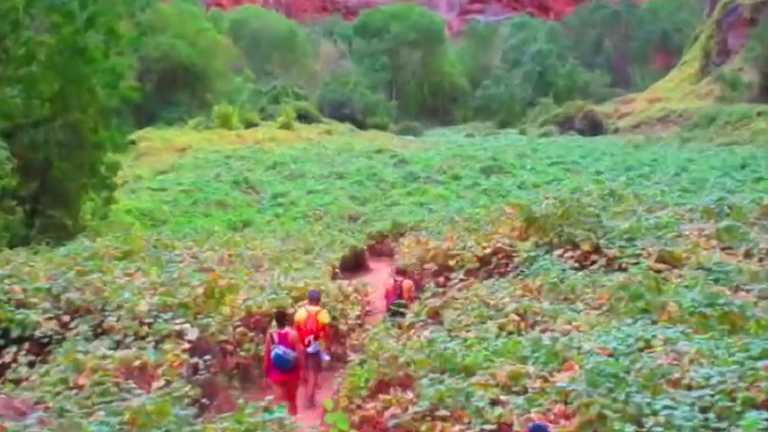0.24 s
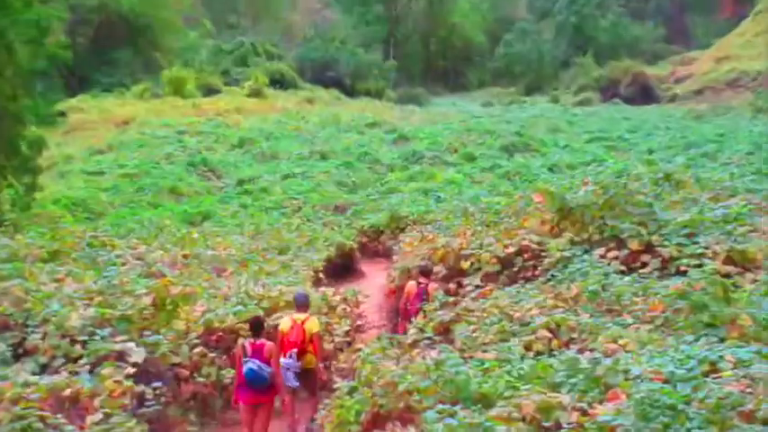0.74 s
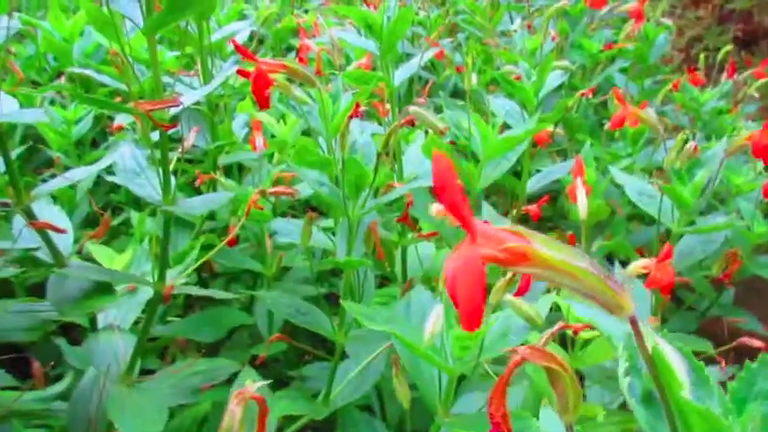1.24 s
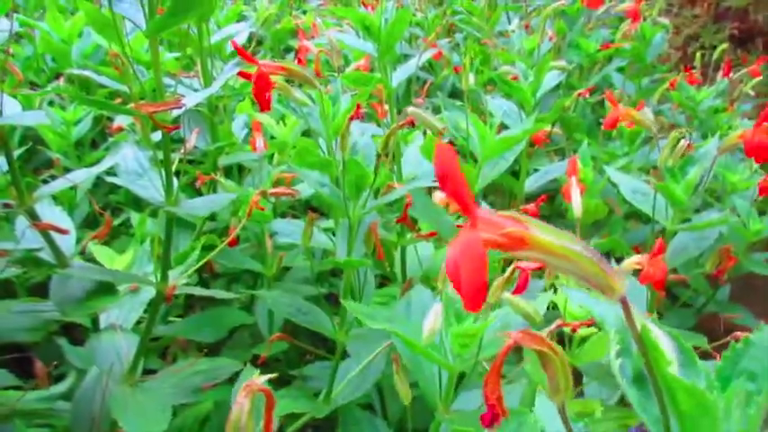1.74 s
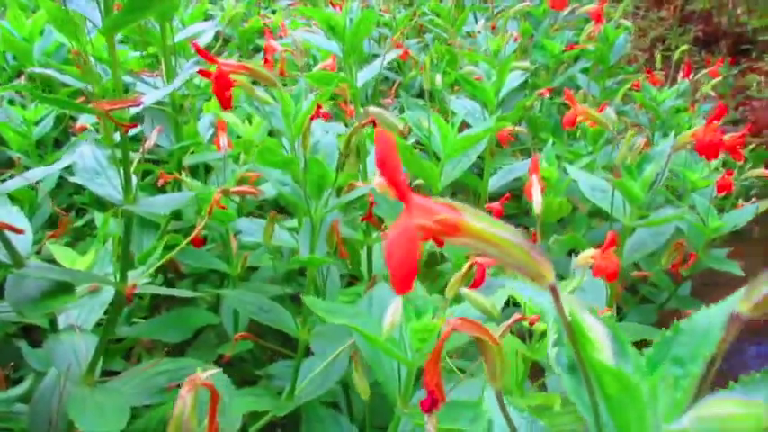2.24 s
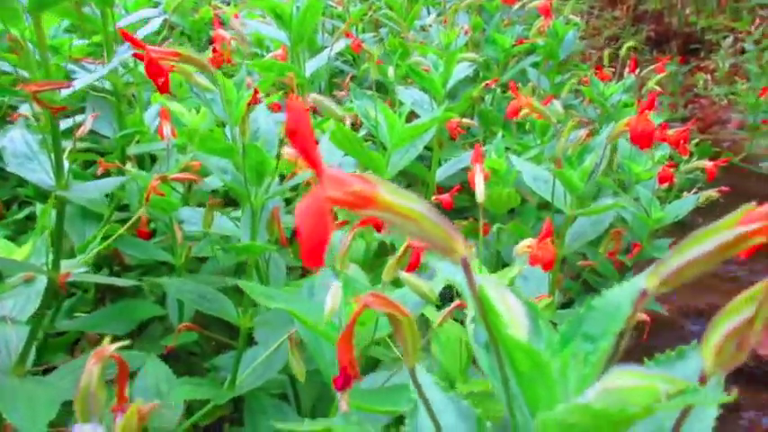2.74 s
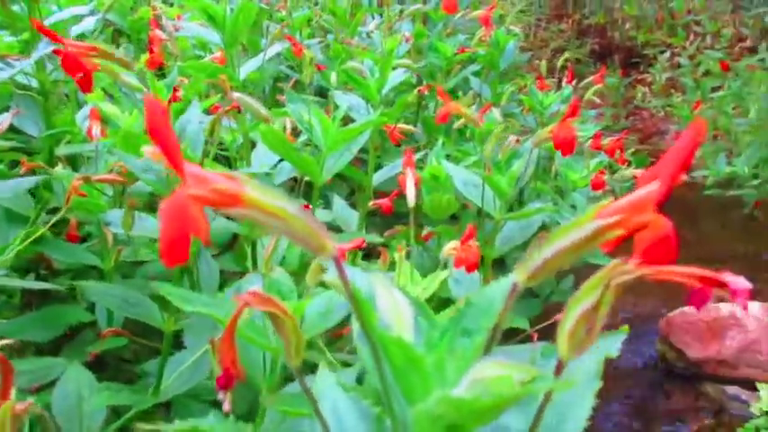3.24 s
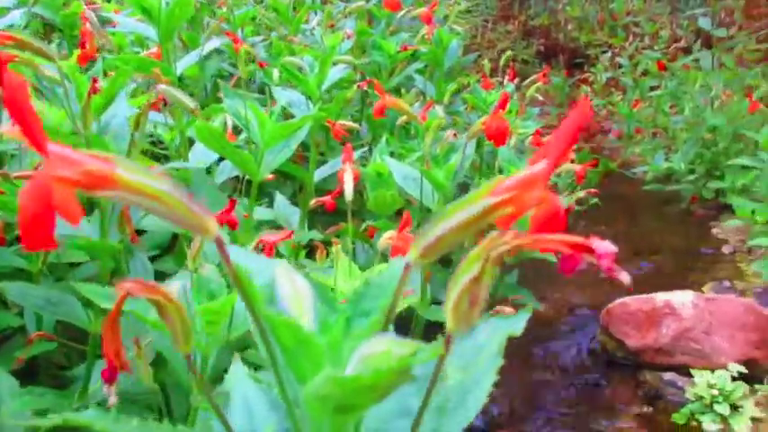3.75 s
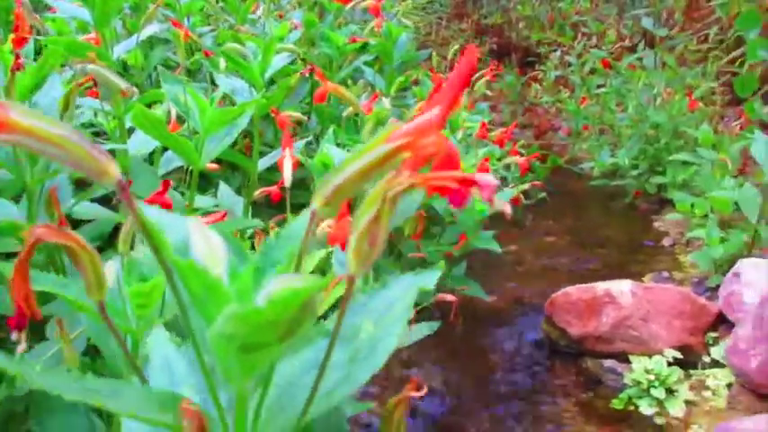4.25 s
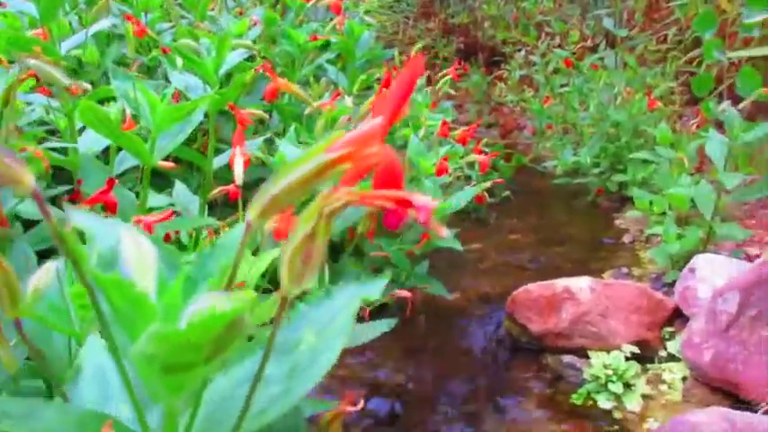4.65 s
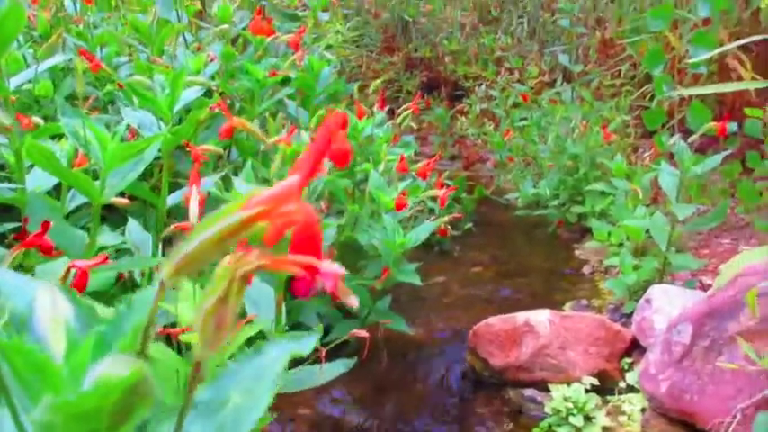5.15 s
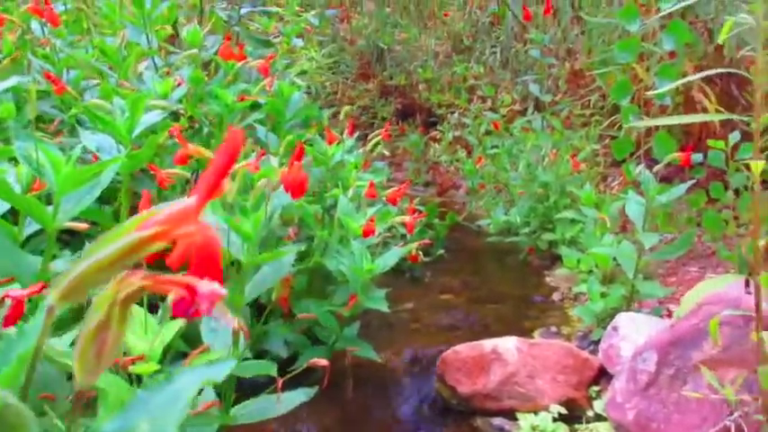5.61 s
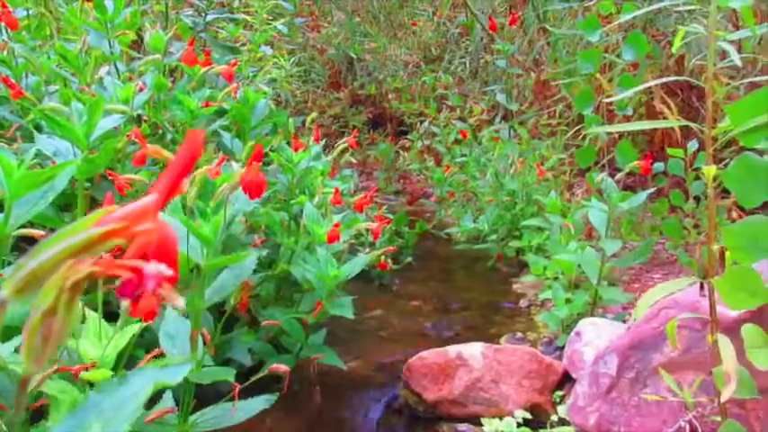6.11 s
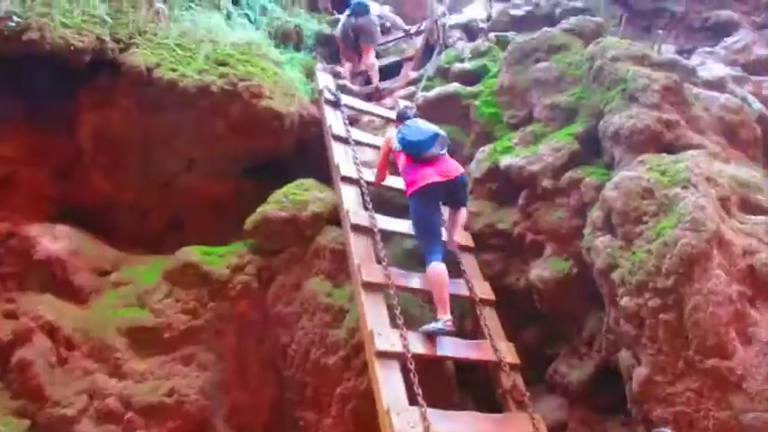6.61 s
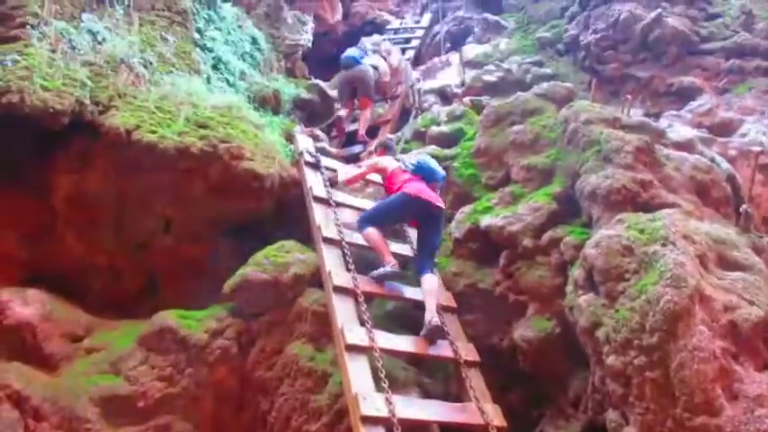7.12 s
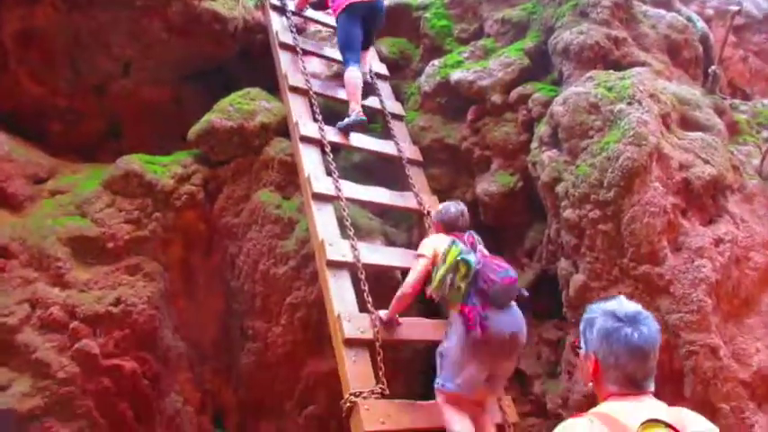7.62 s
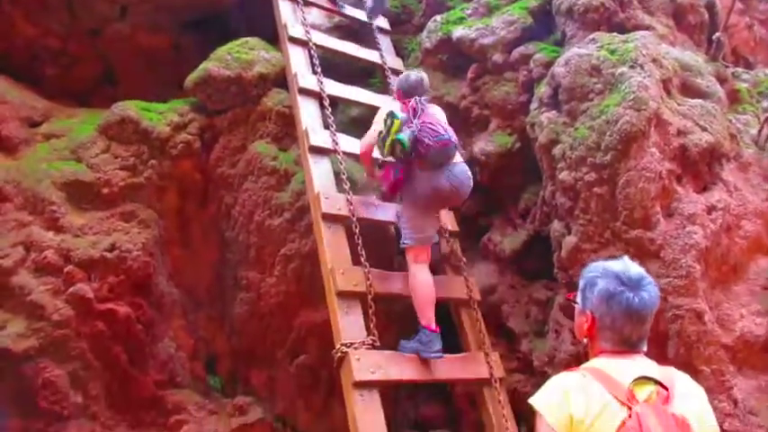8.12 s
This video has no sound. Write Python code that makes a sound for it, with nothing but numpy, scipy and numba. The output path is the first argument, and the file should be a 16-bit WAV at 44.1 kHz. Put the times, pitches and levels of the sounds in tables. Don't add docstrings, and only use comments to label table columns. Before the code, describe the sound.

Across a meadow, faraway water gives a smooth muffled roar with slight surges, narrow and centred, then stops. After a short gap a lively stream is heard very near, bubbling over stones with clear drops and fine hissing droplets, filling and easing a little. Another cut, then a broad stereo waterfall swells up smoothly, rumbling and diffuse, with thin high hiss from the microphones, holding to the end.

```python
import sys
import numpy as np
from scipy import signal
from scipy.fft import rfft, irfft, next_fast_len
from scipy.io import wavfile
from scipy.ndimage import uniform_filter1d, map_coordinates
from numba import njit

SR = 44100
rng = np.random.default_rng(int(sys.argv[2]) if len(sys.argv) > 2 else 0)


def transcribe(signal):
    frames = np.atleast_2d(signal).T
    limited = np.clip(frames, -1, 1)
    pcm = np.round(limited * 32767).astype(np.int16)
    wavfile.write(sys.argv[1], SR, pcm)


def ratio_of_db(decibels):
    return 10 ** (np.asarray(decibels, float) / 20)


N = 369103

# start in seconds, end in seconds, closing fade in seconds.
BROOK_TIME = (1.2735, 6.3925, 0.00047)
# time in seconds, level in dB.
BROOK_FLOW = [
    (1.27, -37),
    (1.5, -36),
    (1.8, -34.5),
    (2.1, -33),
    (2.6, -31.5),
    (3.1, -33.5),
    (3.6, -32.5),
    (5.6, -32.5),
    (6.0, -33),
    (6.4, -33),
]
FULL_FLOW_DB = -32.5
# frequency in Hz, side minus mid in dB.
PAIR_WIDTH = [(60, -10), (130, -7), (290, -2.5), (640, -4), (1410, -4), (3100, -3.5), (6820, 3),
              (15000, 0.5)]


def brook():
    flow_db, = curves(BROOK_FLOW)
    spray_db = -46.5 + 1.8 * (flow_db - FULL_FLOW_DB)
    # frequency in Hz, level in dB per Hz.
    bed_tone = [(12, -40), (20, -3.5), (92, 2.5), (286, -3.5), (1310, -8), (3360, -17), (8860, -36),
                (13800, -42.5), (15000, -48.5)]
    bed = ratio_of_db(flow_db + 0.27 * wobble(15)) * rush(bed_tone, patchy_db=1.5)[0]
    gurgle = babble(count=2600, centre_hz=1501, octaves=0.91, cycles=32.6, spread_db=2.6, clump=0.5)
    spray = babble(count=9000, centre_hz=7000, octaves=0.6, cycles=40, spread_db=1.7, clump=0.9)
    swarms = ratio_of_db(flow_db - 6.5) * gurgle + ratio_of_db(spray_db - 5.5) * spray
    splashing = ratio_of_db(spray_db - 1.5) * splashes()
    water = bed + swarms + splashing + glugs() + plinks() + spits() + mist()
    return water * sounding(*BROOK_TIME)


def babble(count, centre_hz, octaves, cycles, spread_db, clump):
    # frequency in Hz, level in dB per Hz.
    bubble_tone = [(180, -32), (300, -3), (1040, -1.5), (2100, -7.5), (2560, -6), (3120, -6.5), (8880, -22),
                   (13800, -24.5), (15000, -48.5)]
    density = np.cumsum(np.exp(clump * wobble(25)))
    u, g = rng.random((count, 2)), rng.standard_normal((count, 3))
    s = np.interp(u[:, 0], density / density[-1], np.arange(N) / SR)
    hz = np.clip(centre_hz * 2 ** (octaves * g[:, 0]), 250, 14800)
    level_db = along(bubble_tone, hz) - spread_db * np.log(u[:, 1] + 0.006)
    gain = ratio_of_db(level_db) * hz ** 0.79
    life = cycles * np.exp(0.38 * g[:, 1])
    return unit(bubbles(N, SR, s, gain, hz, life, 0.11 * g[:, 2], 0.9))


def glugs():
    # start in seconds, peak in dB, pitch in Hz.
    clear_glugs = [(1.672, -22.5, 630), (2.08, -16.5, 1120), (2.154, -21.5, 692), (2.422, -17.5, 697),
                   (2.537, -19, 1230), (2.628, -23, 689), (2.745, -22, 1045), (2.781, -22, 870),
                   (2.968, -20.5, 1040), (3.076, -22, 1150), (3.322, -22, 1000), (3.476, -21, 844),
                   (3.701, -20, 334), (3.769, -21, 1210), (4.338, -21.5, 1470), (5.182, -18.5, 1279),
                   (5.45, -20, 680), (5.56, -20, 1070), (5.632, -17, 556), (5.711, -18.5, 1090),
                   (5.973, -14, 1020), (6.089, -20.5, 1140), (6.105, -19.5, 960), (6.192, -20, 448),
                   (6.253, -21, 498)]
    s, db, hz = crowd(clear_glugs, count=40, level_db=-25.5, spread_db=5, low_hz=331.4, high_hz=1297).T
    life = 36.6 * (hz / 1000) ** 0.44
    glide = 0.03 + 0.07 * rng.standard_normal(len(s))
    return bubbles(N, SR, s, ratio_of_db(db), hz, life, glide, 1.87)


def plinks():
    # start in seconds, peak in dB, pitch in Hz.
    clear_plinks = [(1.661, -17.5, 2100), (1.7214, -24, 2640), (2.0107, -23.5, 2240), (2.111, -20.5, 2560),
                    (2.2417, -19.5, 2560), (2.417, -24, 1960), (2.6643, -20.5, 3180), (2.8615, -19.5, 2530),
                    (3.3665, -16.5, 3620), (3.393, -19, 2060), (3.4116, -20.5, 2430), (3.67, -15.5, 1640),
                    (3.761, -17, 1720), (3.8515, -18.5, 2620), (4.091, -19, 2660), (4.1012, -14.5, 2800),
                    (4.4302, -14.5, 2530), (4.537, -21, 2080), (4.5792, -19, 2340), (4.6733, -21.5, 1880),
                    (4.746, -18, 2550), (4.8497, -17.5, 1680), (4.994, -20, 2950), (5.2378, -15, 2320),
                    (5.329, -18.5, 3450), (5.361, -17.5, 3480), (5.644, -20.5, 2410), (5.9364, -23, 3720),
                    (6.3598, -20, 3540)]
    rows = crowd(clear_plinks, count=90, level_db=-28, spread_db=7.5, low_hz=1510, high_hz=2790)
    ringing = drops(rows, cycles=33.0, rise=0.77, lift_db=-0.1, scatter=0.244, lag=0.0022)
    impact = drops(rows * [1, 1, 1.3], cycles=7, rise=0.25, lift_db=-3.5, scatter=0.5, lag=0.0006)
    return ringing + impact


def spits():
    # start in seconds, peak in dB, pitch in Hz.
    clear_spits = [(1.6052, -31, 5160), (1.7344, -29, 5130), (1.9783, -28, 5300), (2.1559, -31.5, 5430),
                   (2.2986, -32.5, 5080), (2.4847, -29.5, 5090), (2.6766, -28.5, 4290), (2.77, -30, 4300),
                   (3.3652, -27, 5600), (3.859, -30.5, 4300), (4.3689, -31.5, 5070), (4.4956, -28.5, 4220),
                   (4.6682, -28, 4400), (4.6892, -25.5, 5300), (5.049, -31.5, 4800), (5.182, -29, 5900),
                   (5.2364, -30, 6200), (5.4794, -31, 4350), (5.8595, -30, 4400), (5.9358, -27, 4660),
                   (6.1024, -19.5, 3800), (6.1688, -29, 6340)]
    rows = crowd(clear_spits, count=34, level_db=-33.5, spread_db=4, low_hz=4180, high_hz=6870)
    ringing = drops(rows, cycles=60.0, rise=0.5, lift_db=0.5, scatter=0.15, lag=0.0013)
    return ringing + spatter(rows, low_hz=4000, decay=0.0064, lift_db=-17)


def mist():
    # start in seconds, peak in dB, pitch in Hz.
    clear_droplets = [(2.235, -35.5, 8400), (2.343, -30.5, 9000), (2.4835, -33.5, 7765),
                      (2.7999, -31.5, 7530), (3.195, -35, 7910), (3.3655, -31, 7770),
                      (3.3944, -30.5, 10110), (3.7149, -32, 7760), (3.7387, -33, 9050), (3.86, -28.5, 8000),
                      (3.9468, -24.5, 7750), (4.098, -34.5, 8200), (4.5884, -28.5, 8600),
                      (4.7327, -33, 11300), (5.0488, -35, 10100), (5.1163, -31, 9000), (5.183, -31, 9100),
                      (5.245, -31.5, 8770), (5.5774, -34, 7990), (5.653, -30.5, 10460),
                      (5.862, -33.5, 8690), (6.1876, -34, 7540), (6.3014, -33.5, 8320), (6.3336, -30, 7990)]
    # start in seconds, peak in dB, pitch in Hz.
    clear_specks = [(2.0741, -47, 11500), (3.0379, -45, 12500), (3.3941, -41, 11600), (3.4834, -45, 13000),
                    (3.6625, -45, 11900), (3.6984, -43, 12000), (3.9493, -37, 13200), (4.2097, -40, 11800),
                    (4.5884, -37, 11600), (4.9241, -43, 12800), (5.182, -40, 11500), (5.7527, -42, 12700),
                    (5.8166, -43, 11500), (6.3005, -45.5, 11900)]
    fine = crowd(clear_droplets, count=50, level_db=-38.5, spread_db=7.5, low_hz=7520, high_hz=11000)
    finest = crowd(clear_specks, count=45, level_db=-46, spread_db=10, low_hz=11000, high_hz=14500)
    droplets = drops(fine, cycles=24.3, rise=0.85, lift_db=4.5, scatter=0.17, lag=0.0025)
    specks = drops(finest, cycles=25, rise=1.4, lift_db=3.5, scatter=0.08, lag=0.0012)
    return droplets + specks + spatter(fine, low_hz=7400, decay=0.0051, lift_db=-13)


def splashes():
    # frequency in Hz, level in dB per Hz.
    splash_tone = [(1470, -24.5), (2500, 0), (3110, -8), (3350, -6), (8810, -15.5), (13900, -30.5),
                   (15000, -34)]
    u = rng.random((800, 2))
    strength = ratio_of_db(-4.5 * np.log(u[:, 1] + 0.03))
    starts = np.bincount((u[:, 0] * N).astype(int), strength, N)
    return unit(dying(starts, decay=0.0044) * rush(splash_tone, patchy_db=3.5)[0])


def spatter(rows, low_hz, decay, lift_db):
    s, db, _ = np.transpose(rows)
    starts = np.bincount((s * SR).astype(int), ratio_of_db(db + lift_db), N)
    spray_tone = [(low_hz * 0.31, -30), (low_hz, 0), (15000, -12)]
    return dying(starts, decay) * rush(spray_tone, patchy_db=6.5)[0]


def crowd(rows, count, level_db, spread_db, low_hz, high_hz):
    start, end, _ = BROOK_TIME
    u = rng.random((count, 3))
    s = start + (np.arange(count) + u[:, 0]) / count * (end - start)
    flow_db = np.interp(s, *np.transpose(BROOK_FLOW)) - FULL_FLOW_DB
    db = level_db + spread_db * (u[:, 1] - 0.5) + flow_db
    hz = low_hz * (high_hz / low_hz) ** u[:, 2] ** 1.5
    return np.vstack([rows, np.c_[s, db, hz]])


def drops(rows, cycles, rise, lift_db, scatter, lag, count=3):
    s, db, hz = np.repeat(rows, count, axis=0).T
    chance = rng.standard_normal((len(s), 4))
    satellite = np.arange(len(s)) % count > 0
    s = s + satellite * lag * abs(chance[:, 2])
    hz = np.minimum(hz * np.exp(satellite * scatter * (chance[:, 3] + 0.35)), 14800)
    life = cycles * np.exp(0.29 * chance[:, 0])
    gain = ratio_of_db(db + lift_db - 8.2 * satellite)
    return bubbles(N, SR, s, gain, hz, life, 0.038 * chance[:, 1], rise)


@njit
def bubbles(n, sr, s, gain, hz, cycles, glide, rise):
    out = np.zeros(n)
    for k in range(len(s)):
        start = int(s[k] * sr)
        for i in range(min(int(cycles[k] * sr / hz[k]), n - start)):
            c = i * hz[k] / sr
            swell = np.exp(-np.log(1000) * c / cycles[k]) * (1 - np.exp(-c / rise))
            out[start + i] += gain[k] * swell * np.sin(2 * np.pi * c * (1 + glide[k] * c / cycles[k]))
    return out


def fall():
    # time in seconds, level in dB.
    fall_level = [(6.45, -37), (6.8, -37), (7.4, -37), (7.7, -37), (8.05, -37), (8.37, -37)]
    # frequency in Hz, level in dB per Hz.
    fall_tone = [(120, -9), (200, -6.5), (379, -7), (461, -5.5), (873, -7), (963, -8), (1760, -11),
                 (2980, -16), (6530, -35), (10000, -40.5), (13000, -70), (22000, -120)]
    rumble_tone = [(12, -33), (20, -23), (35, 3.5), (65, -9), (108, 1.5), (269, -6.5), (350, -8),
                   (460, -37), (770, -120)]
    # frequency in Hz, left minus right in dB.
    lean = [(60, -3), (180, -1.0), (550, 1.5), (1650, 1.5), (4970, 0), (15000, 0.5)]
    fall_db, = curves(fall_level)
    body = ratio_of_db(fall_db + 0.25 * wobble(19)) * rush(fall_tone, patchy_db=0.2, width=PAIR_WIDTH)
    rumble = ratio_of_db(fall_db - 0.4 + 0.7 * wobble(7)) * rush(rumble_tone, patchy_db=1, width=PAIR_WIDTH)
    halves = np.array([[0.5], [-0.5]])
    wide = filtered(body + rumble + microphone_hiss(), lambda hz: ratio_of_db(along(lean, hz) * halves))
    opening = np.clip((np.arange(N) / SR - 6.444) / 1.28, 0, 1)
    return wide * np.sin(np.pi / 2 * opening)


def cascade():
    # start in seconds, end in seconds, closing fade in seconds.
    meadow_time = (0, 1.118, 0.013)
    # time in seconds, level in dB.
    surges = [
        (0.0, -28.5),
        (0.37, -29),
        (0.406, -27),
        (0.45, -29.5),
        (0.654, -28),
        (0.68, -29),
        (1.1, -28),
    ]
    # frequency in Hz, level in dB per Hz.
    roar_tone = [(15, -43), (25, -11), (43, -10.5), (75, -4), (109, -1), (154, -2.5), (181, -2), (558, -2),
                 (673, -4), (1150, -9.5), (1720, -17), (2240, -16.5), (5420, -34.5), (9270, -38.5),
                 (15000, -52)]
    level_db, = curves(surges)
    roar = ratio_of_db(level_db + 0.3 * wobble(14) + 0.8 * wobble(40)) * rush(roar_tone, patchy_db=0.8)[0]
    brushing = np.exp(-((np.arange(N) / SR - 0.402) / 0.008) ** 2)
    blades = [(4000, -31), (6500, 1.5), (13000, -8), (15000, -16.5)]
    grass = ratio_of_db(-49) * brushing * rush(blades, patchy_db=2)[0]
    return (roar + grass) * sounding(*meadow_time)


def microphone_hiss():
    # frequency in Hz, level in dB per Hz.
    hiss_tone = [(3530, -35), (6000, -17), (8150, -12), (10500, 2), (11700, 0.5), (15600, -3.5)]
    return ratio_of_db(-64.1 + 0.7 * wobble(14)) * rush(hiss_tone, patchy_db=0.3, width=PAIR_WIDTH)


def rush(tone, patchy_db, width=((100, -90), (1000, -90))):
    z = signal.stft(rng.standard_normal((2, N)), nperseg=512)[2]
    field = uniform_filter1d(rng.standard_normal(z.shape[1:]), size=6, axis=0)
    field = uniform_filter1d(field, size=6, axis=1)
    pair = signal.istft(z * ratio_of_db(patchy_db * unit(field)), nperseg=512)[1][:, :N]

    def colour(hz):
        return (hz > 12) * ratio_of_db(along(tone, hz) + [0 * hz, along(width, hz)])

    mid, side = filtered(pair, colour)
    return np.array([mid + side, mid - side]) / np.std(mid)


def dying(starts, decay):
    return signal.lfilter([1], [1, -np.exp(-1 / (decay * SR))], starts)


def sounding(start, end, fade):
    t = np.arange(N) / SR
    return (t >= start) * np.clip((end - t) / fade, 0, 1)


def wobble(rate):
    knots = rng.standard_normal(int(N * rate / SR) + 4)
    return map_coordinates(knots, [np.arange(N) * rate / SR])


def curves(rows):
    s, *cols = np.transpose(rows)
    return [np.interp(np.arange(N) / SR, s, c) for c in cols]


def along(points, hz):
    f, v = np.transpose(points)
    return np.interp(np.log(hz + 1), np.log(f + 1), v)


def filtered(x, response):
    m = next_fast_len(N + 8192)
    return irfft(rfft(x, m) * response(np.fft.rfftfreq(m, 1 / SR)), m)[..., :N]


def unit(x):
    return x / np.sqrt(np.mean(x ** 2) + 1e-20)


def scene():
    def band(hz):
        return np.where(hz < 14990, 1, ratio_of_db([[-60], [-32]])) * hz / np.hypot(hz, 8)

    mono = filtered(np.array([cascade(), brook()]), band).sum(axis=0)
    heard = sounding(0, 1.145, 0.02) + sounding(1.272, 6.412, 0.002)
    return mono * heard + fall()


def roll_off(x):
    return signal.sosfilt(signal.butter(12, 15700, fs=SR, output="sos"), x)


def record(dry):
    return roll_off(dry)


dry = scene()
out = record(dry)
transcribe(out)
```